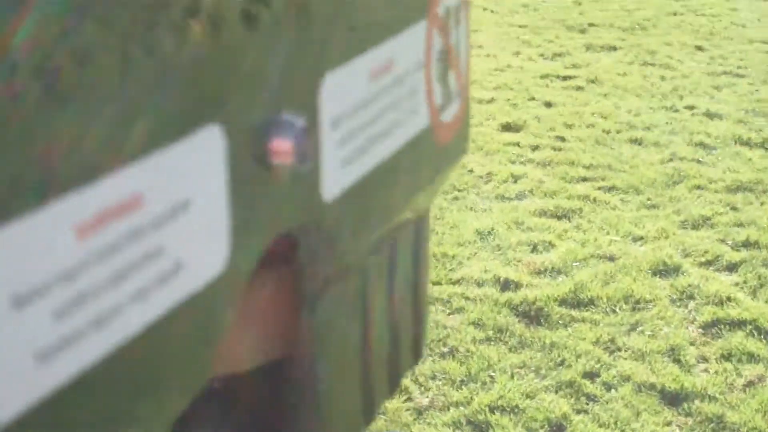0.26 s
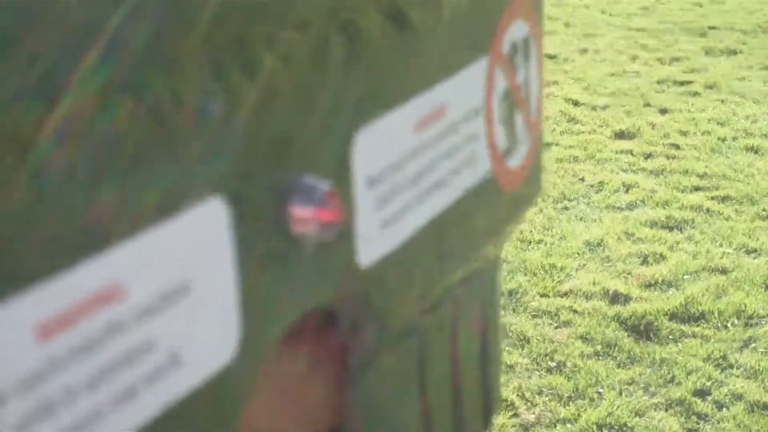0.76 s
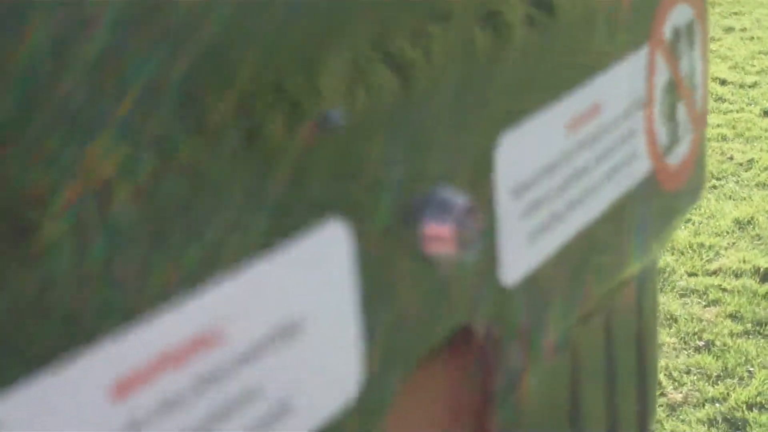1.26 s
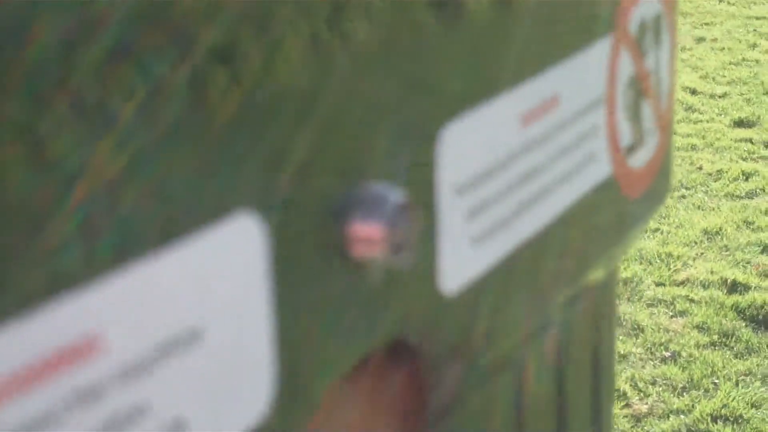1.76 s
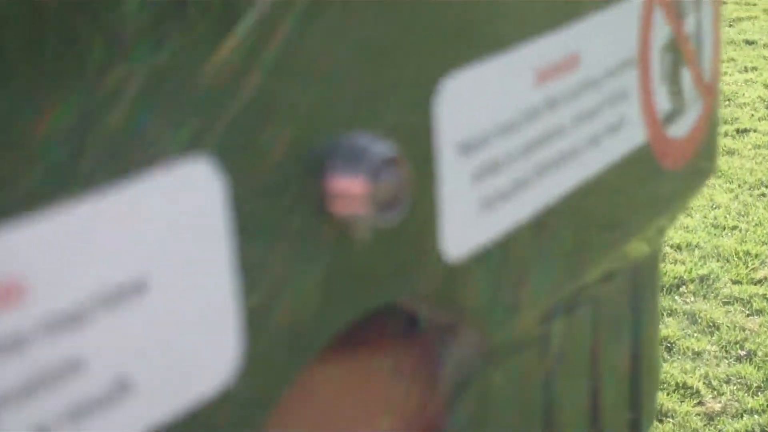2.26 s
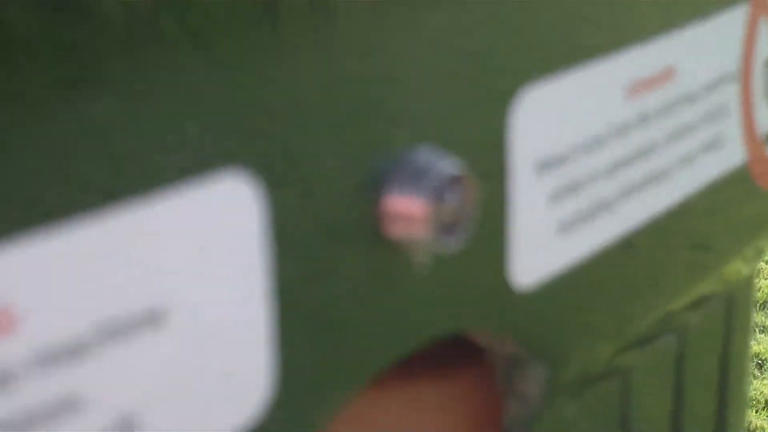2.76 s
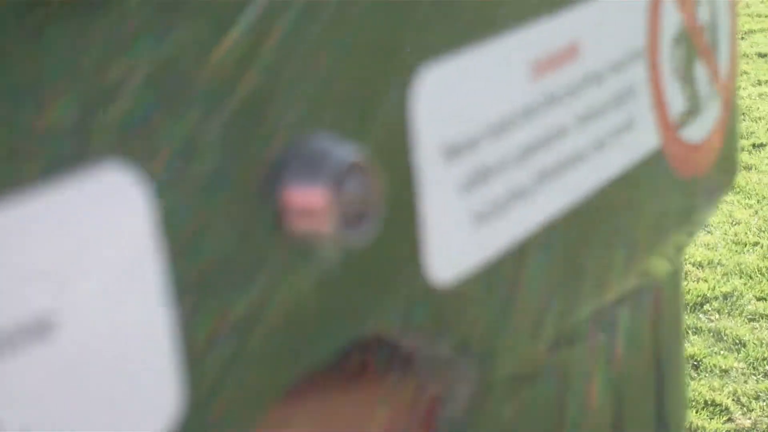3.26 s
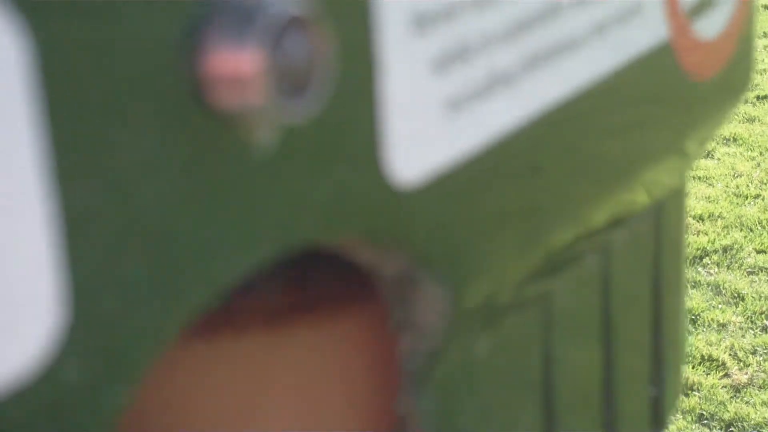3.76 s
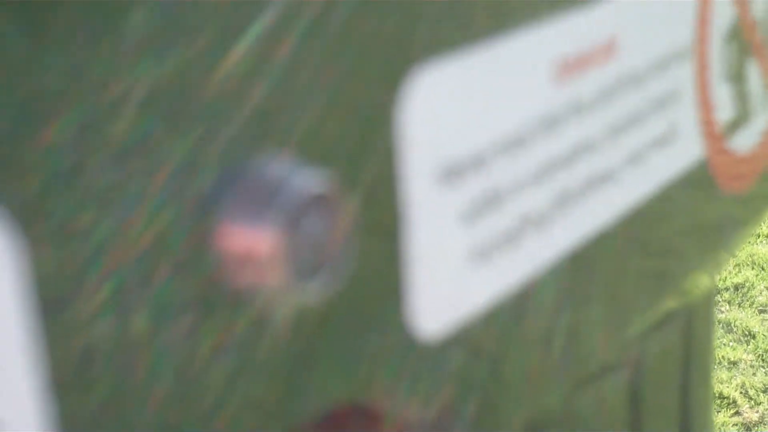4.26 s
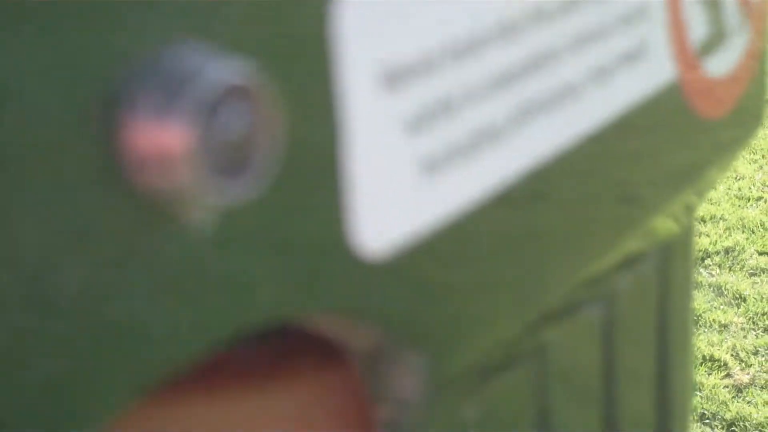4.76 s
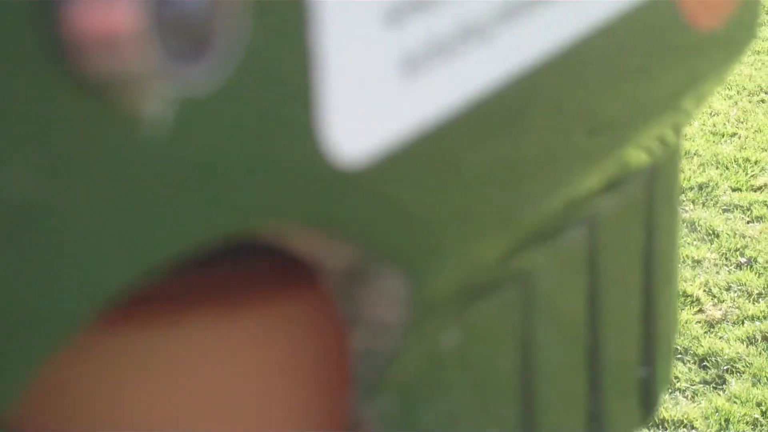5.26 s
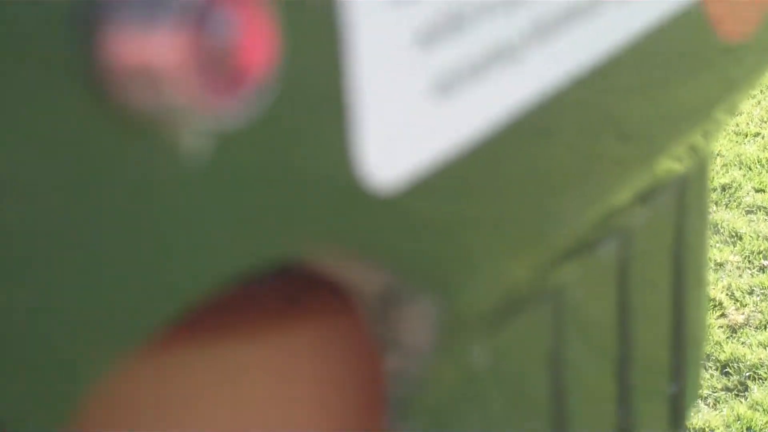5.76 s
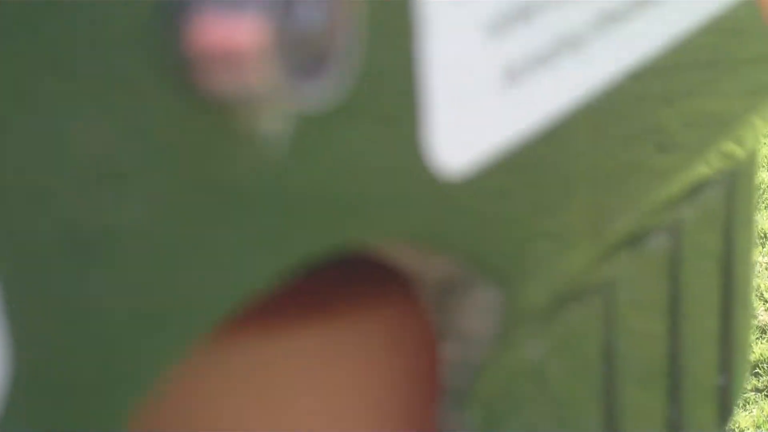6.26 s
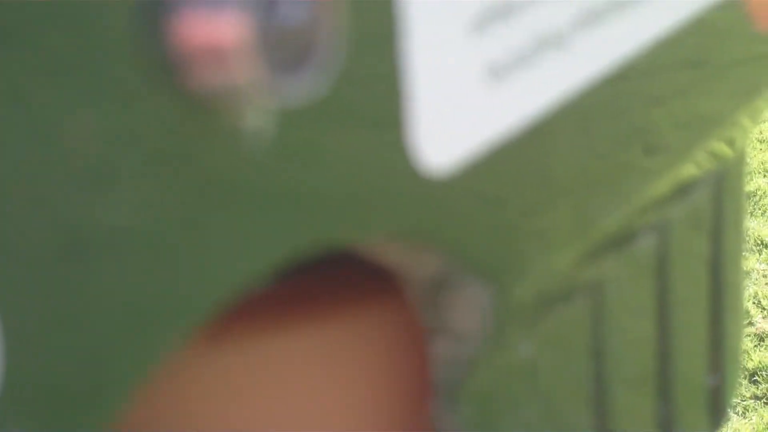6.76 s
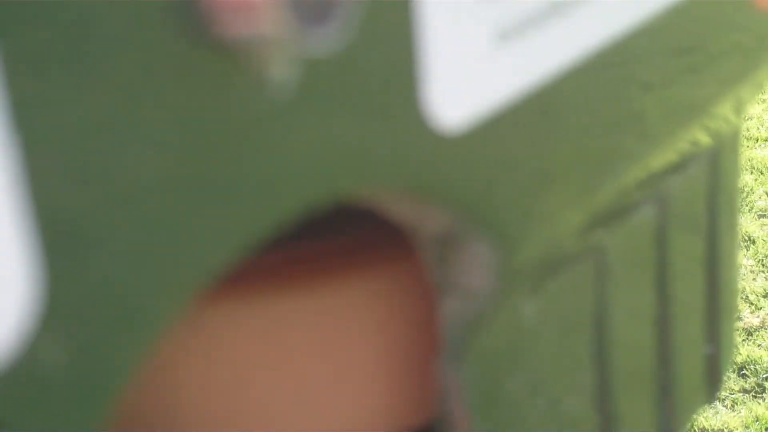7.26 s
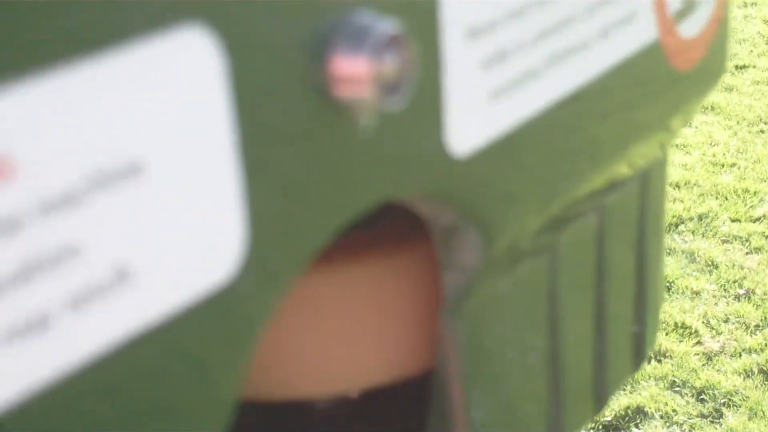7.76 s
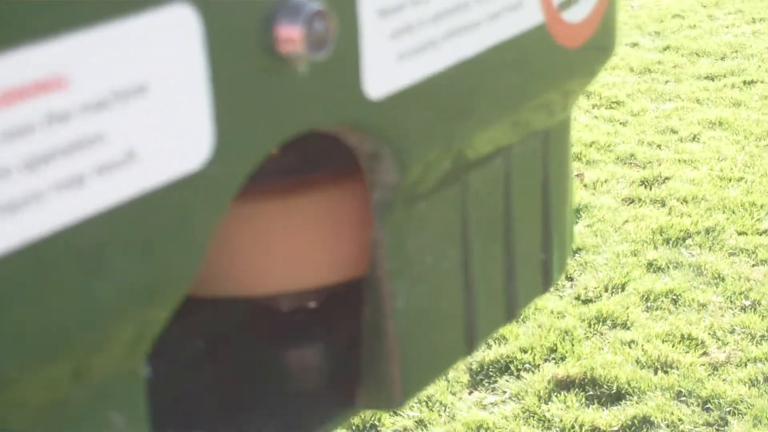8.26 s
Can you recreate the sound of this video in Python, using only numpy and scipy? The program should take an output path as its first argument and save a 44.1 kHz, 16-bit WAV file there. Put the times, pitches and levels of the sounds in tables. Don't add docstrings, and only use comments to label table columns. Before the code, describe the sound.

Outdoors on grass, a ball throwing machine is heard very close in mono, with dry sound and little reflection. From 0 seconds the wheels give a rough, throbbing low-mid hum, with fast uneven rubber knocks, bright plastic ticks that come and go, a thin metallic ring and airy hiss. Tone shifts as the microphone moves around the casing. Light wind rumbles at first. At 1.5 a ball pops out with a hard distorted slap; the level drops sharply, then swells back within half a second, while the motor, slowed by about a fifth, gradually climbs in pitch. Ticking is busiest from 2 to 4. Around 3.45 the next ball knocks sharply in the hopper, with a hollow bounce. A faint gear whine wavers underneath. At 6.54 a second slap repeats the duck and slowdown. Wind buffets near 7.8 to 8.1, then a hollow bump lands at 8.5.

```python
import sys
import numpy as np
from scipy import signal
from scipy.fft import rfft, irfft, next_fast_len
from scipy.io import wavfile
from scipy.ndimage import uniform_filter1d, map_coordinates

SR = 44100
rng = np.random.default_rng(int(sys.argv[2]) if len(sys.argv) > 2 else 0)


def unload_wav(signal):
    wavfile.write(
        sys.argv[1],
        SR,
        np.round(np.clip(np.atleast_2d(signal).T, -1, 1) * 32767).astype(np.int16),
    )


def gain_from_db(level_db):
    decades = np.asarray(level_db, float) / 20
    return 10 ** decades


N = 376173

# time_s, loudness_db, mouth_view_db, shell_nearness_db, bearing (-1.35..1, no
CAMERA = [(0, -14, 6, -3.5, 0.57), (.35, -10.5, 6.5, 1.5, -0.77), (.68, -11.5, 3.5, -4, -1.35),
          (.85, -16.5, 7.5, -1, 1), (1.1, -13.5, 5, 0.5, 0.73), (1.47, -13, 5, -1.5, 0.93),
          (2.05, -13.5, 6, 0, 0.28), (3.2, -12, 3.5, 0.5, 0.2), (3.8, -11.5, 1, 2, 0.29),
          (4.5, -11, -0.5, 0.5, -0.28), (5.2, -13, 0.5, 0.5, -1.2), (5.9, -12, -1.5, -0.5, -0.11),
          (6.5, -12, 0, -0.5, -0.42), (7.05, -11, 0, 1, -0.66), (8.05, -10, 2.5, 0.5, -0.7),
          (8.11, -13, -1, 1, 0.024), (8.27, -12.5, 0, 1, 0.46), (8.53, -14, 8, 2.5, 0.39)]
# freq_hz, level_db_per_hz
HUM = [(65, -16.5), (110, -22.5), (183, -12.5), (237, -13.5), (318, -4), (371, -5.5), (420, -1.5),
       (551, -9.5), (618, -55), (700, -23), (910, -52), (1540, -120)]


def wheels():
    loud_db, view_db, near_db, bearing = curves(CAMERA)
    turn = shaft()
    orders, clarity_db = shaft_orders(turn, near_db, bearing)
    sputter_db, grit_db = 2.6 * wobble(45), 2.2 * wobble(260)
    throb_db = 2.9 * np.cos(turn) + 3.6 * np.cos(2 * turn - .8) + sputter_db + grit_db
    hum = gain_from_db(3.5 + clarity_db) * orders + coloured(shake(0.37, throb_db), HUM)
    hum = hum / np.hypot(1, gain_from_db(4.0 + clarity_db))
    body = wheel_body(turn, throb_db, view_db)
    ring = bearing_ring(throb_db)
    hiss = air_hiss(throb_db, view_db, near_db, bearing)
    ring_db = -24 + 3.2 * near_db + 0.42 * wobble(6)
    whole = hum + gain_from_db(-8.5 + 0.41 * view_db) * body + gain_from_db(ring_db) * ring + gain_from_db(-22 + 0.58 * view_db) * hiss
    unsteady_db = 0.51 * wobble(8.2)
    return gain_from_db(loud_db + unsteady_db) * (whole + gain_from_db(view_db) * rattle(turn))


# time_s, loss_turns_per_s, recovery_time_constant_s
SLOWDOWNS = [
    (-3.5, 12.3587, 2.9494),
    (1.4934, 11.1619, 3.2078),
    (6.545, 11.7136, 3.2937),
]


def shaft():
    free_hz, start_turns = 50.6296, -.13
    t = np.arange(N) / SR
    latest = np.searchsorted([row[0] for row in SLOWDOWNS], t) - 1
    start, loss, recovery = np.transpose(SLOWDOWNS)[:, latest]
    speed = free_hz - loss * np.exp(-(t - start) / recovery)
    return 2 * np.pi * (start_turns + np.cumsum(speed) / SR)


# shaft_multiple, level_db
ORDERS = [(1, -0.5), (2, -6.5), (3, -12.5), (4, 0.5), (5, -1), (6, 4), (7, -2.5), (8, -7.5), (9, 1),
          (10, -4), (11, -1.5), (12, 3.5), (13, 1), (14, -2), (15, 0), (16, 2), (17, -6), (18, 3), (19, -2),
          (20, 0.5), (21, -4.5), (23, 1), (24, 4)]
# freq_hz, level_db
HOUSING = [(40, -10), (190, 3), (260, -2.5), (345, 4), (425, 6), (480, -12), (535, 2.5), (620, -18.5),
           (800, -6.5), (950, -3.5), (1150, -47), (1400, -60)]
# time_s, ninth_order_db, eighth_order_db, eleventh_order_db, steadiness_db
PANELS = [(0, 6.5, 0, 0, -2.5), (.8, 2, 7, -7, 2), (.95, 4, 0, 4, -3.5), (1.4, 5.5, -3, 6.5, -1),
          (2.2, 1, 15, 1, 3.5), (2.8, 4.5, 4, -6, -0.5), (3.2, -1, 7, -9, 4), (3.9, 1, -10, -9, -4.5),
          (4.9, -0.5, 3, 2, 0), (5.1, 1.5, -2, 2, -1.5), (5.25, 8, -1, -1, 2.5), (5.6, 1, 4, 2, -2.5),
          (5.95, 1, -7, 4, 8), (6.1, 1.5, -3, -1, -0.5), (6.5, 2.5, -5, 3, 1.5), (7.4, -13, 6, 6, 3),
          (8.53, 6, 3, -6, -8)]


def shaft_orders(turn, near_db, bearing):
    speed = np.gradient(turn) * SR / (2 * np.pi)
    ninth_db, eighth_db, eleventh_db, steady_db = curves(PANELS)
    settle_db = .7 * (speed - speed.mean())
    clarity_db = steady_db + 0.12 * near_db + settle_db
    beam_db = 14 * bearing
    lobes = {6: beam_db / 3, 7: beam_db, 8: eighth_db, 11: eleventh_db}
    lobes[9] = ninth_db + 1.5 * settle_db
    lines = np.zeros(N)
    for k, db in ORDERS:
        waver_db = (.75 if k == 9 else 1.3) * (1.1 * wobble(2.5) + 2.2 * wobble(14))
        phase = (.3 + .026 * k) * wobble(10) + rng.uniform(0, 2 * np.pi)
        lines += gain_from_db(db + lobes.get(k, 0) + waver_db) * np.sin(k * turn + phase)
    return coloured(lines, HOUSING), clarity_db


# freq_hz, level_db_per_hz
BODY = [(340, -34), (580, 3), (611, -7.5), (783, 6), (929, 2.5), (1020, 5), (1110, -6.5), (1220, -3),
        (1380, -6.5), (1690, -6.5), (1880, -8), (2310, -21.5), (2480, -20.5), (2790, -15.5), (2970, -17.5),
        (3180, -15.5), (3400, -16.5), (3600, -17), (4130, -34), (4500, -20), (5850, -27), (9900, -120)]


def wheel_body(turn, throb_db, view_db):
    knocking = gain_from_db(-9 + .7 * view_db) * taps(turn)
    body = unit(knocking + coloured(shake(0.49, throb_db), BODY))
    upper = filtered(body, lambda hz: 1 / (1 + (2300 / (hz + 1)) ** 8))
    return body + (gain_from_db(view_db) - 1) * upper


# freq_hz, width_hz, level_db
TAP = [(858, 230, 3), (1194, 37, 2.5), (1605, 320, -2)]


def taps(turn):
    at, square = contacts(turn)
    chance = rng.standard_normal((N // 300, 2))[:len(at)]
    size_db = 1.2 * chance[:, 0] + 5 * square
    late = (8 * chance[:, 1]).astype(int)
    blows = np.bincount(np.clip(at + late, 0, N - 1), gain_from_db(size_db), N)
    return unit(filtered(resonant(blows, TAP), lambda hz: 1 / (1 + (hz / 2050) ** 8)))


def bearing_ring(throb_db):
    grit = gain_from_db(.6 * throb_db + wobble(70)) * rng.standard_normal(N)
    return unit(resonant(resonant(grit, [(4785, 130, 0)]), [(4790, 260, 0)]))


# freq_hz, level_db_per_hz
HISS = [(3000, -10), (5100, -2), (5510, -6), (5800, 4), (6700, 6.5), (7270, 8.5), (7960, 1), (8430, -0.5),
        (9680, 1), (12000, -15), (14100, -3.5), (14600, -0.5), (15200, -2), (16000, -14)]
# freq_hz, width_hz, level_db
VENT = [(8440, 225, -0.5)]
# freq_hz, width_hz, level_db
COWL = [(9230, 160, -8)]


def air_hiss(throb_db, view_db, near_db, bearing):
    hiss = coloured(shake(0.54, throb_db), HISS)
    vent = gain_from_db(1.6 * view_db) * resonant(hiss, VENT)
    hiss = hiss + vent + gain_from_db(near_db - 0.75 * view_db) * resonant(hiss, COWL)
    delay_s = .0021 + .0003 * bearing
    return hiss + gain_from_db(-8) * map_coordinates(hiss, [np.arange(N) - SR * delay_s])


def shake(depth, throb_db):
    return gain_from_db(depth * throb_db) * rng.standard_normal(N)


# freq_hz, width_hz, level_db
TICK = [(1620, 200, -4), (2780, 200, -9), (7250, 480, -8), (8560, 150, -14)]


def rattle(turn):
    at, square = contacts(turn)
    scatter_db = 1.5 * rng.standard_normal(N // 300)[:len(at)]
    db = -8 + 12 * (square - 1) + scatter_db
    ticks = resonant(bursts(at / SR, db + 25, .011), TICK)
    return filtered(ticks, lambda hz: 1 / (1 + (hz / 9000) ** 8))


# time_s, laps
CREEP = [(0, .4), (.46, 4.39), (.74, 6.38), (1.37, 8.99), (1.62, 10.64), (1.8, 11.41), (2.37, 13.56),
         (2.67, 15.19), (3.01, 16.23), (3.92, 22.01), (4.54, 26.49), (5.24, 29.15), (5.39, 30.29),
         (5.93, 32.88), (6.8, 37.31), (7, 38.01), (8.11, 43.24), (8.53, 44.68)]


def contacts(turn):
    half = np.floor(turn / np.pi)
    at = np.flatnonzero(np.diff(half)) + 1
    laps = curves(CREEP)[0][at]
    return at, np.cos(np.pi * half[at]) * np.cos(2 * np.pi * laps)


# time_s, peak_db
HARD_TICKS = [(0.0648, -25), (0.192, -26), (0.2453, -21), (0.2987, -22), (0.4254, -18), (0.4783, -20),
              (0.6255, -18), (0.6784, -24), (0.9288, -21), (0.9822, -24), (1.0031, -23), (1.0236, -23),
              (1.044, -17), (1.0645, -21), (1.2725, -24), (1.3867, -19), (1.4391, -21), (1.7165, -32),
              (1.8028, -30), (1.9624, -16), (2.0722, -19), (2.0961, -18), (2.2049, -22), (2.2283, -13),
              (2.3361, -15), (2.3595, -17), (2.383, -23), (2.4423, -19), (2.4897, -23), (2.5486, -18),
              (2.6304, -13), (2.6539, -18), (2.7586, -12), (2.7816, -14), (2.817, -21), (2.8409, -21),
              (2.9317, -16), (2.9552, -18), (3.035, -18), (3.0574, -19), (3.0809, -22), (3.1378, -20),
              (3.239, -19), (3.2809, -13), (3.2964, -11), (3.3747, -19), (3.3977, -17), (3.4535, -11),
              (3.5319, -20), (3.6097, -22), (3.6885, -18), (3.7653, -15), (3.8432, -16), (3.8985, -20),
              (3.8983, -20), (3.9752, -12), (3.9971, -17), (4.1288, -14), (4.2051, -16), (4.26, -20),
               (4.281, -18), (4.3573, -20), (4.4117, -18), (4.4331, -18), (4.466, -18), (4.5633, -20),
               (4.6816, -19), (4.8008, -25), (4.8212, -19), (4.8961, -19), (4.9385, -21), (4.9918, -16),
               (5.0253, -19), (5.0662, -20), (5.1196, -18), (5.1739, -20), (5.1949, -20), (5.2158, -20),
               (5.2373, -22), (5.5017, -20), (5.5216, -19), (5.5955, -25), (5.7426, -18), (5.7751, -24),
               (5.8379, -20), (5.8584, -21), (5.9422, -23), (6.0255, -20), (6.0465, -18), (6.1407, -19),
               (6.1821, -21), (6.2231, -20), (6.2749, -21), (6.3488, -22), (6.4421, -18), (6.9758, -24),
               (7.0113, -20), (7.1834, -21), (7.2073, -17), (7.2328, -23), (7.3161, -18), (7.3679, -23),
               (7.4248, -15), (7.5326, -22), (7.6393, -15), (7.7456, -21), (7.8514, -17), (7.9232, -22),
               (8.0025, -25), (8.2789, -26), (8.4275, -20), (8.463, -20)]
# time_s,
# peak_db
HARD_TAPS = [(0.404, -11), (0.583, -12), (0.846, -7), (0.866, -6), (0.888, -9), (0.908, -5), (0.93, -10),
             (0.981, -8), (1.045, -10), (1.064, -8), (1.115, -10), (1.19, -8), (1.232, -8), (1.37, -8),
             (1.418, -8), (1.439, -6), (1.488, -5), (1.489, -2), (1.741, -15), (1.938, -9), (1.962, -7),
             (1.987, -6), (2.034, -7), (2.096, -5), (2.134, -5), (2.313, -8), (2.36, -9), (2.372, -4),
             (2.466, -4), (2.503, -7), (2.525, -6), (2.573, -6), (2.63, -6), (2.713, -7), (2.748, -8),
             (2.793, -1), (2.816, -4), (2.839, -9), (2.931, -9), (3.013, -7), (3.092, -5), (3.22, -6),
             (3.33, -3), (3.398, -7), (3.409, -4), (3.454, -3), (3.487, -6), (3.513, -1), (3.566, -10),
             (3.579, -7), (3.621, -8), (3.667, -7), (3.776, -8), (4.008, -7), (4.031, -6), (4.093, -6),
             (4.151, -8), (4.183, -9),
             (4.216, -7), (4.303, -4), (4.368, -6), (4.39, -6), (4.498, -7), (4.541, -6), (4.617, -8),
              (4.639, -9), (4.755, -9), (4.778, -7), (4.798, -9), (4.95, -9), (5.216, -7), (5.236, -7),
              (5.278, -9), (5.3, -7), (5.342, -10), (5.375, -8), (5.395, -9), (5.417, -5), (5.438, -5),
              (5.458, -7), (5.479, -8), (5.689, -8), (5.774, -7), (5.794, -9), (5.92, -8), (5.983, -9),
              (6.004, -8), (6.139, -8), (6.161, -7), (6.181, -9), (6.221, -9), (6.296, -8), (6.4, -8),
              (6.441, -10), (6.461, -9), (6.524, -10), (6.537, -1), (6.711, -21), (6.875, -14),
              (6.973, -11), (6.987, -8), (7.011, -9), (7.036, -10), (7.098, -6), (7.122, -7), (7.207, -7),
              (7.292, -7), (7.317, -8), (7.425, -8), (7.509, -8), (7.553, -7), (7.617, -7), (7.64, -7),
              (7.805, -9), (7.887, -10), (8.075, -8)]
# freq_hz, level_db, t60_s
LOOSE_PART = [(2150, -9, .015), (2760, -8, .022), (3350, -14, .015), (5300, -13, .01), (5950, -9, .01),
              (6600, -4, .01), (6950, -2, .011), (7200, -1, .023), (7480, -3, .011), (8560, -14, .014)]
# freq_hz, level_db, t60_s
RUBBER = [(770, -1, .021), (930, 0, .02), (1230, -17, .03), (1530, -6, .016), (1750, -8, .014)]


def hard_knocks():
    ticks = rings(HARD_TICKS, LOOSE_PART, rise_s=.001)
    knocks = rings(HARD_TAPS, RUBBER, rise_s=.001)
    return gain_from_db(2) * ticks + gain_from_db(-1.5) * knocks


def rings(rows, modes, rise_s):
    x, t = np.zeros(N + SR), np.arange(SR // 40) / SR
    hz, db, t60 = np.transpose(modes)[:, :, None]
    rise = 1 - np.exp(-(t / rise_s) ** 2)
    for s, peak_db in rows:
        size, pitch = rng.standard_normal((2, len(modes), 1))
        cycles = hz * (1 + .015 * pitch) * (t - rise_s)
        tones = gain_from_db(db + 3 * size - 60 * t / t60) * np.sin(2 * np.pi * cycles + 99 * size[0])
        ring = np.sum(tones, 0) * rise
        x[round(s * SR):][:len(t)] += gain_from_db(peak_db) * ring / np.abs(ring).max()
    return x[:N]


SLAPS = [
    1.4892,
    6.538,
]
# slap_db, gain_duck_db, gain_recovery_s
THROWS = [
    (16, 20.5, 0.41),
    (16, 17.5, 0.36),
]
# freq_hz, width_hz, level_db
CHUTE = [(190, 110, 26), (490, 220, -37), (930, 1000, 20)]


def balls():
    slap, blows = np.zeros(N), np.zeros(N)
    for s, (db, *_) in zip(SLAPS, THROWS):
        t = np.clip(np.arange(N) / SR - s + .0013, 0, .1)
        cycles = 400 * t + .3 * (1 - np.exp(-t / .001))
        slap -= gain_from_db(db - 60 * t / 0.025) * np.sin(2 * np.pi * cycles)
        blows[round(s * SR)] = gain_from_db(db + 6)
    scuff = bursts(SLAPS, [row[0] - 7.5 for row in THROWS], t60=0.011)
    return slap + resonant(blows + scuff, CHUTE)


# time_s, peak_db, bright_db, hollow_db
KNOCKS = [
    (3.4545, -9, -24, -16),
    (3.461, -5, -24, -6),
    (3.4648, -2, -18, -6),
    (3.5135, -12, -26, 12),
    (3.522, -18, -25, 14),
]
# freq_hz, width_hz, level_db
HOPPER = [(1930, 290, 12), (2720, 500, 2), (3840, 1500, 0)]
# freq_hz, width_hz, level_db
SNAP = [(5030, 1300, 0), (7900, 1600, 10), (14500, 1800, -21)]
# time_s, peak_db, pitch_hz, t60_s
BUMP = [
    (8.502, 3, 730, 0.073),
]


def hopper():
    s, db, bright_db, hollow_db = np.transpose(KNOCKS)
    knock = resonant(resonant(bursts(s, db + 12.5, 0.013), HOPPER), [(2500, 4900, 0)])
    knock += resonant(bursts(s, db + bright_db + 25, 0.015), SNAP)
    knock += resonant(bursts(s, db + hollow_db + 30.5, 0.0061), [(1210, 140, 3.0), (750, 280, 2)])
    for at, peak_db, hz, t60 in BUMP:
        t = np.maximum(np.arange(N) / SR - at, 0)
        rise = 1 - np.exp(-t / 0.0013)
        knock = knock + gain_from_db(peak_db - 60 * t / t60) * np.sin(2 * np.pi * hz * t) * rise
    return knock


# time_s, mesh_hz, level_db, brightness_db_per_overtone, middle_overtone_db
FEEDER = [(.09, 893, -50, 4, -3), (.15, 885, -39, 2, 6), (.33, 805, -40, 0, 5), (.5, 828, -43, 5, -5),
          (.68, 818, -43, 5, -8), (.8, 870, -45, 2, -3), (.9, 885, -39, 1, 3), (1, 918, -38, 2, 0),
          (1.4, 918, -43, 0, 2), (2.3, 888, -43, 5, -6), (2.5, 922, -43, 5, -6), (3.26, 912, -40, 5, -6),
          (3.33, 862, -43, 4, -6), (3.42, 835, -39, 1, -6), (3.57, 824, -38, 0, -8),
          (3.8, 842, -35, -3, -11), (3.98, 817, -36, -2, -9), (4.1, 815, -37, -3, -8)]
FEEDER_ON = [(4.27, 855, -39, -7, -10), (4.35, 885, -38, -4, -6), (4.55, 912, -40, -2, -6),
             (4.7, 908, -43, 0, -5), (4.9, 917, -39, -5, -4), (5.12, 910, -36, -2, -6),
             (5.19, 908, -38, -4, -1), (5.27, 862, -42, -9, -9), (5.35, 835, -41, -9, -7),
             (5.41, 800, -40, -8, -3), (5.5, 806, -40, -8, -4), (5.63, 838, -40, -9, -9),
             (5.69, 820, -40, -9, -7), (5.79, 858, -41, -8, -7), (5.87, 872, -43, -5, -6),
             (6.05, 912, -42, -2, 1), (6.5, 905, -48, -2, -4), (7, 918, -44, 0, -2),
             (7.86, 915, -45, 1, -4), (8.2, 905, -54, 0, -4), (8.34, 888, -42, -3, 5),
             (8.44, 862, -41, -1, 3), (8.53, 842, -38, 2, -8)]


def feeder():
    hz, level_db, bright_db, middle_db = curves(FEEDER, FEEDER_ON)
    slack = .00016 * np.maximum(hz - 870, 0)
    jitter = (.0032 + slack) * wobble(140) + .002 * wobble(6) + .004 * wobble(18)
    turn = 2 * np.pi * np.cumsum(hz * (1 + jitter)) / SR
    whine = np.zeros(N)
    for k, db in [(2, level_db - bright_db), (3, level_db + middle_db), (4, level_db + bright_db)]:
        waver_db = 2.0 * wobble(25) + .4 * wobble(4)
        whine += gain_from_db(db + 1 + waver_db) * np.sin(k * turn)
    return whine


# freq_hz, level_db_per_hz
RUMBLE = [(12, -30), (22, -20), (60, -4), (124, -4), (154, -5), (221, -11), (280, -11), (300, -11),
          (390, -21), (660, -120)]


def wind():
    lumps = gain_from_db(0.5 * wobble(11.0) + 1.5 * wobble(35)) * rng.standard_normal(N)
    return gain_from_db(wind_db()) * coloured(lumps, RUMBLE)


# time_s, strength_db
BREEZE = [(0, -4.5), (.7, -6), (1, -32), (1.47, -20.5), (2.05, -31), (3.2, -27), (4.4, -50), (5.1, -29.5),
          (6.4, -20.5), (7.05, -18.5), (8.1, -12), (8.42, -6), (8.53, -18)]
# centre_s, half_length_s, peak_db
GUSTS = [(0.49, 0.028, -35), (1.21, 0.15, -16), (2.24, 0.041, -20.5), (2.574, 0.14, -21.5),
         (4.557, 0.021, -39), (4.707, 0.02, -20.5), (4.99, 0.063, -25.5), (5.21, 0.027, -41),
         (5.416, 0.062, -23), (6.097, 0.066, -44), (6.523, 0.026, -19), (6.792, 0.27, -16),
         (7.834, 0.013, -9), (7.964, 0.045, -4), (8.105, 0.047, -4)]


def wind_db():
    t = np.arange(0, N, 64) / SR
    power = gain_from_db(2 * np.interp(t, *np.transpose(BREEZE)))
    for s, half, db in GUSTS:
        power = power + gain_from_db(2 * db) * np.exp(-((t - s) / half) ** 2)
    return np.interp(np.arange(N) / SR, t, 10 * np.log10(power))


def unit(x):
    return x / np.sqrt(np.mean(x ** 2) + 1e-20)


def curves(*tables):
    s, *cols = np.transpose(np.vstack(tables))
    return [np.interp(np.arange(N) / SR, s, c) for c in cols]


def wobble(rate):
    at = np.arange(0, N + 32, 32)
    knots = rng.standard_normal(int(N * rate / SR) + 4)
    return np.interp(np.arange(N), at, map_coordinates(knots, [at * rate / SR]))


def filtered(x, response):
    m = next_fast_len(N + SR // 2)
    return irfft(rfft(x, m) * response(np.fft.rfftfreq(m, 1 / SR)), m)[:N]


def coloured(x, points):
    hz, db = np.transpose(points)
    return unit(filtered(x, lambda f: gain_from_db(np.interp(np.log(f + 1), np.log(hz), db, -120, -120))))


def resonant(x, peaks):
    def response(f):
        total = 0
        for k, (centre, width, db) in enumerate(peaks):
            damping = 1j * f * width
            total = total + (-1) ** k * gain_from_db(db) * damping / (centre * centre - f * f + damping)
        return total
    return filtered(x, response)


def bursts(times, peak_db, t60):
    x = np.zeros(N + SR)
    t = np.arange(SR * (.06 if t60 > .02 else .02)) / SR
    for s, db in zip(times, peak_db):
        puff = gain_from_db(-60 * t / t60) * rng.standard_normal(len(t))
        x[round(s * SR):][:len(t)] += gain_from_db(db) * puff / np.linalg.norm(puff)
    return x[:N]


def scene():
    return (wheels() + hard_knocks() + feeder() + balls() + hopper() + wind())[None]


def band_limit(x):
    return signal.sosfilt(signal.butter(12, 16380, fs=SR, output="sos"), x)


def record(dry):
    over_db = np.maximum(wind_db() + 21, 0)
    yield_db = uniform_filter1d(0.47 * over_db, round(0.13 * SR))
    gain_db = np.zeros(N)
    for s, (_, duck_db, recovery) in zip(SLAPS, THROWS):
        t = np.maximum(np.arange(N) / SR - s - .002, 0)
        attack = 1 - np.exp(-(t / 0.017) ** 3)
        gain_db -= duck_db * attack * np.clip(1 - (t - .07) / recovery, 0, 1)
    overloaded = np.clip(dry[0] * gain_from_db(-yield_db), -1.15, 1.15)
    sagged = filtered(overloaded, lambda hz: 1j * hz / (1j * hz + 35))
    x = np.clip(sagged * gain_from_db(gain_db), -.99, .99)
    mix = filtered(x, lambda hz: hz < 15280)[None]
    return band_limit(mix)


dry = scene()
out = record(dry)
unload_wav(out)
```